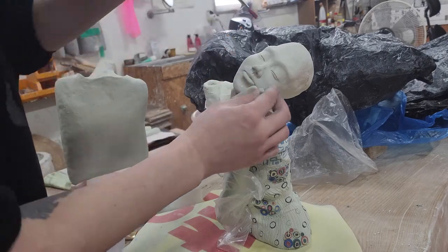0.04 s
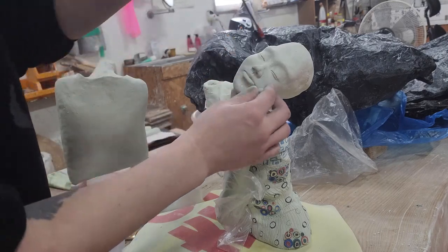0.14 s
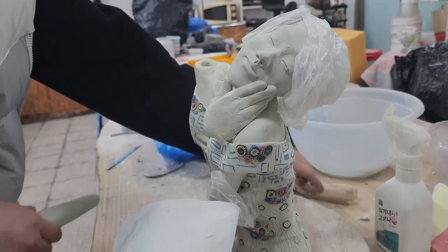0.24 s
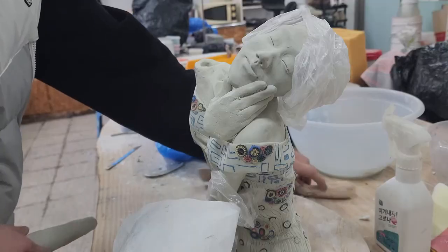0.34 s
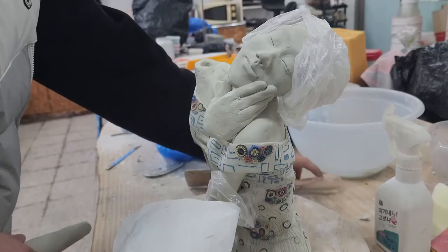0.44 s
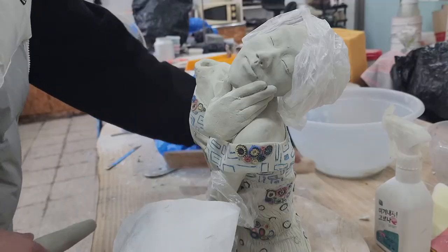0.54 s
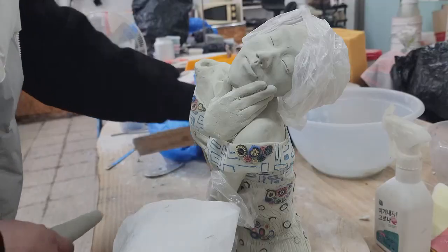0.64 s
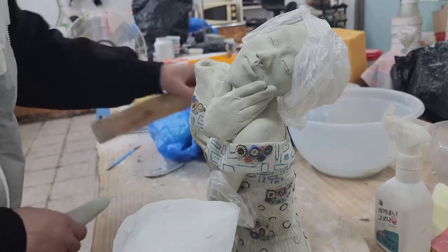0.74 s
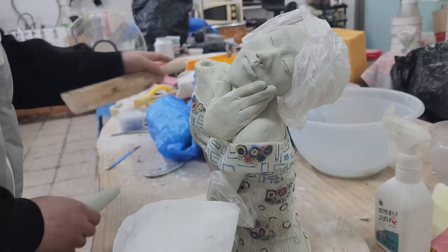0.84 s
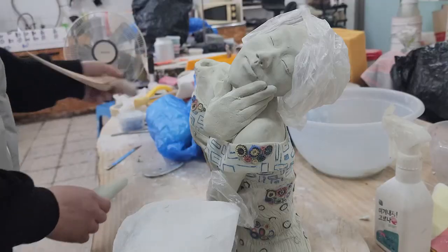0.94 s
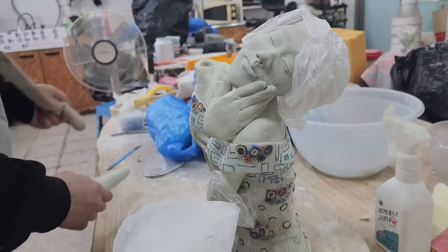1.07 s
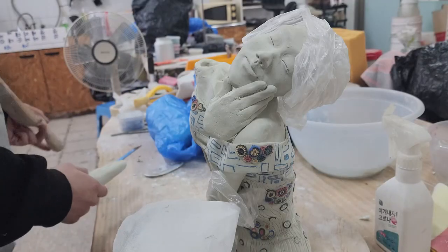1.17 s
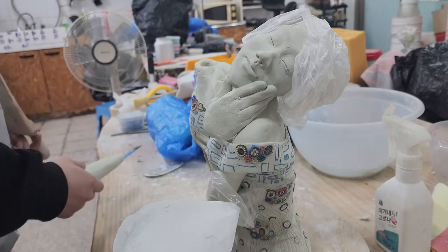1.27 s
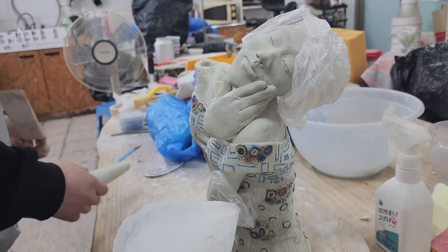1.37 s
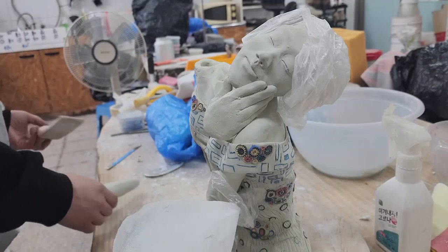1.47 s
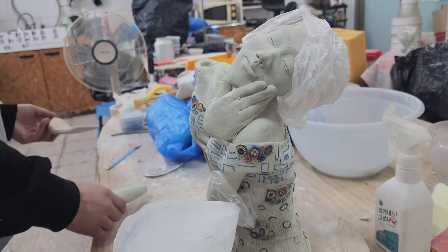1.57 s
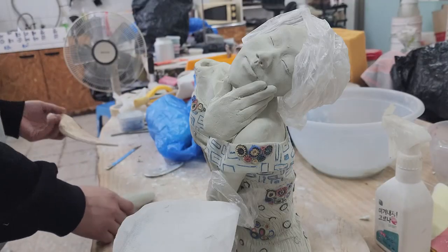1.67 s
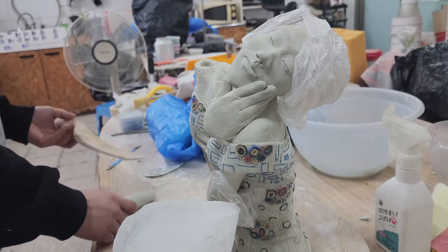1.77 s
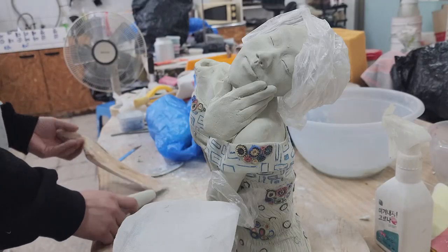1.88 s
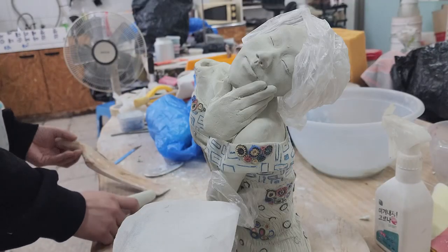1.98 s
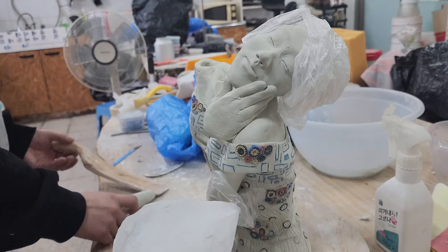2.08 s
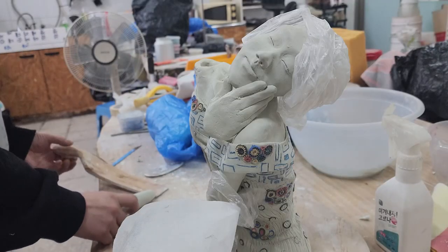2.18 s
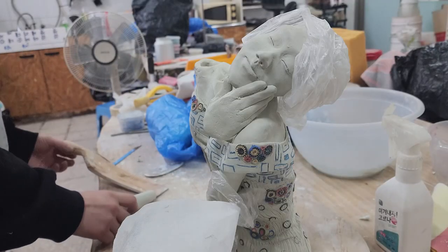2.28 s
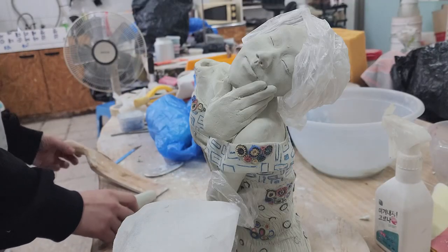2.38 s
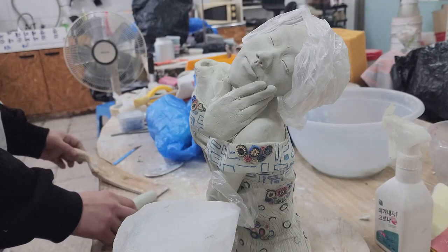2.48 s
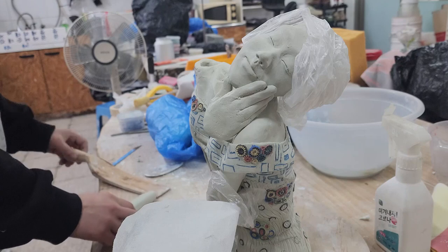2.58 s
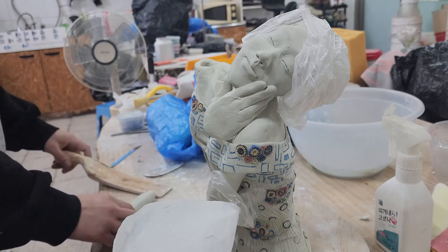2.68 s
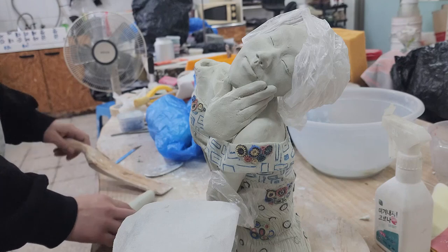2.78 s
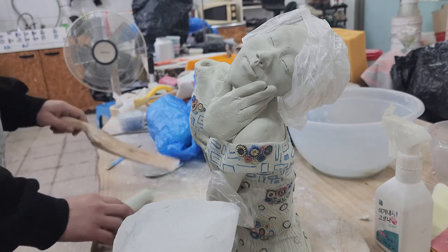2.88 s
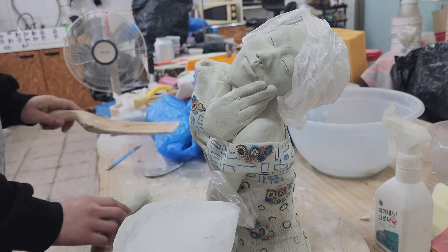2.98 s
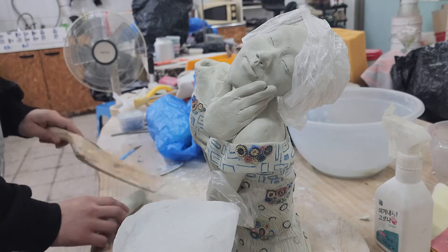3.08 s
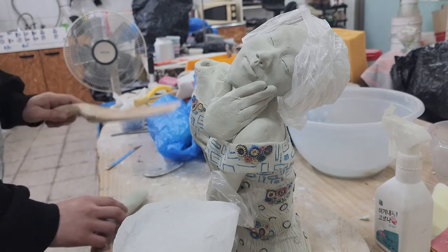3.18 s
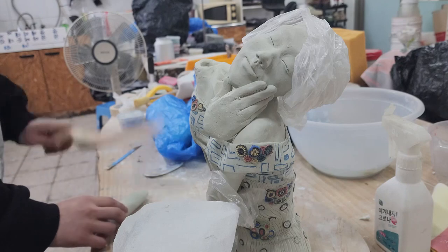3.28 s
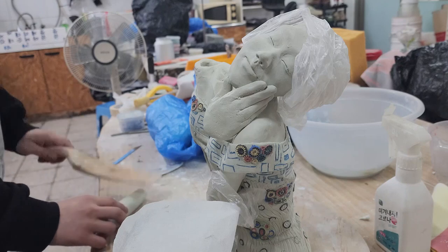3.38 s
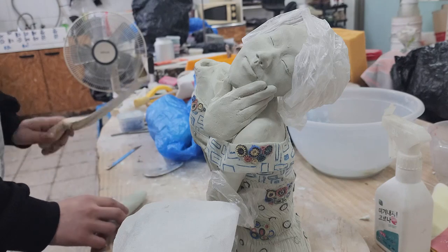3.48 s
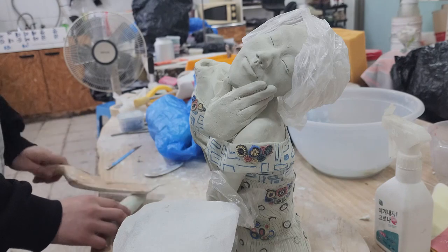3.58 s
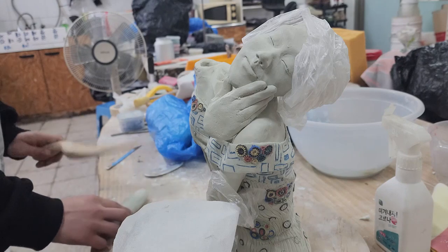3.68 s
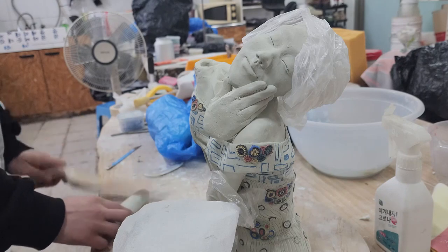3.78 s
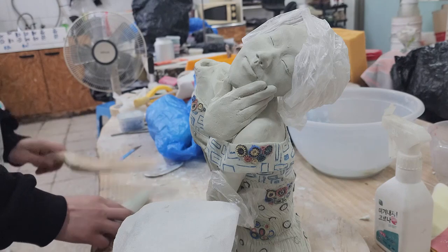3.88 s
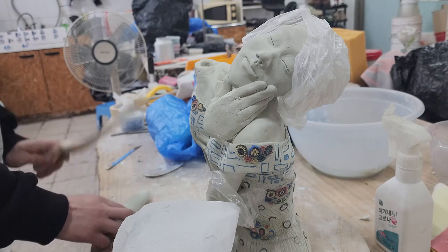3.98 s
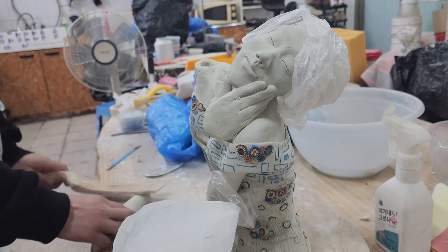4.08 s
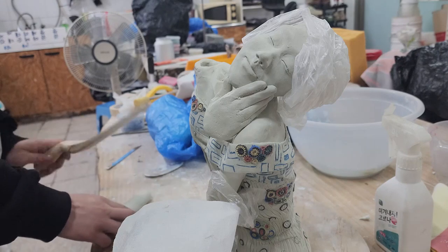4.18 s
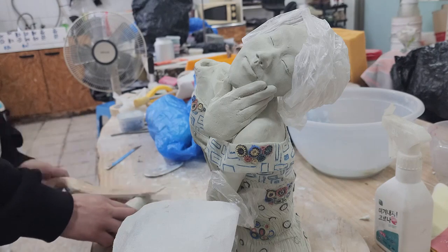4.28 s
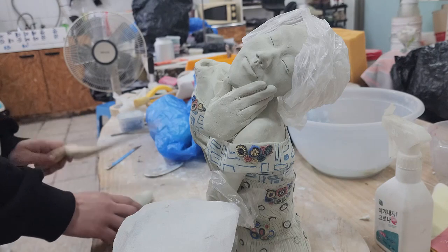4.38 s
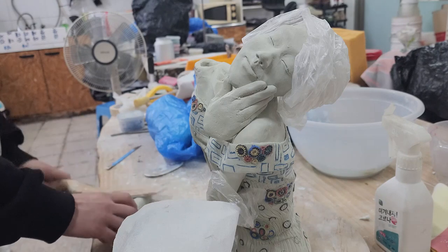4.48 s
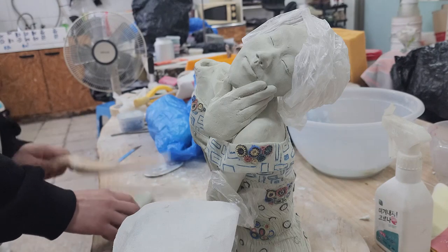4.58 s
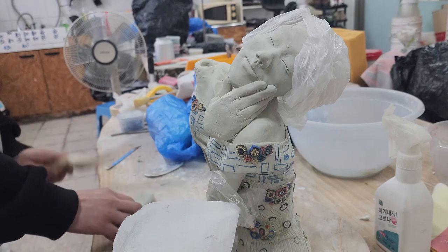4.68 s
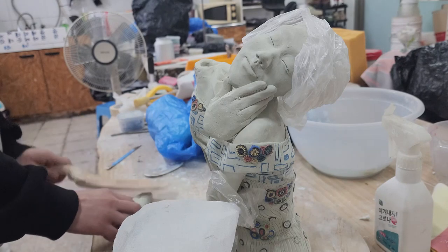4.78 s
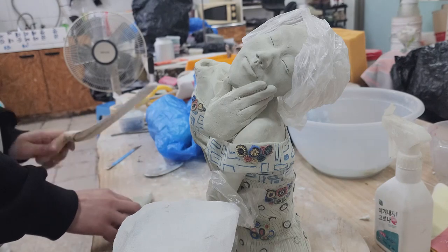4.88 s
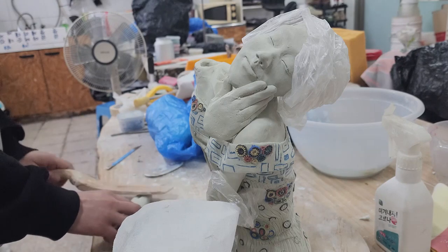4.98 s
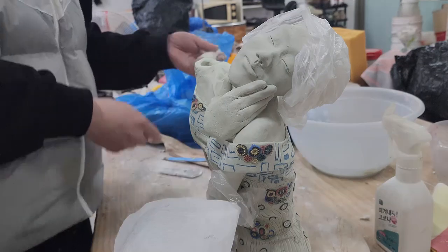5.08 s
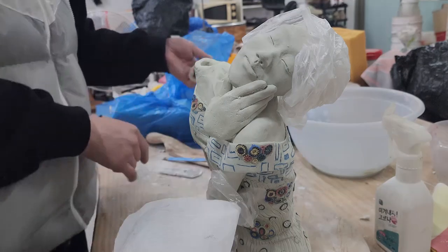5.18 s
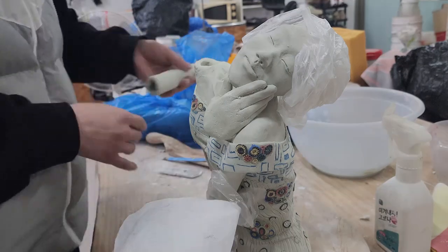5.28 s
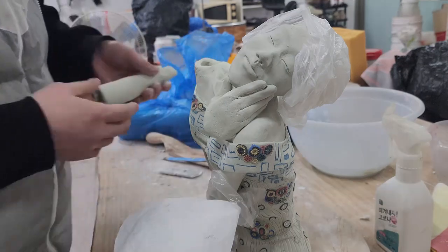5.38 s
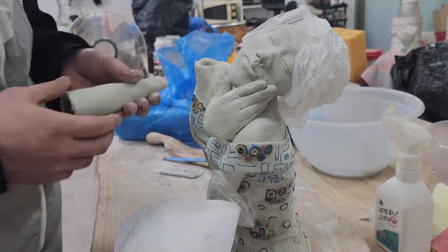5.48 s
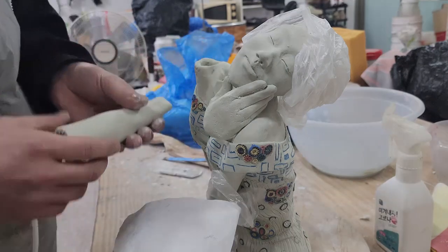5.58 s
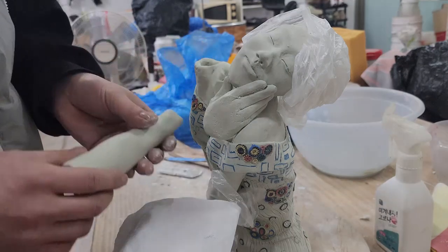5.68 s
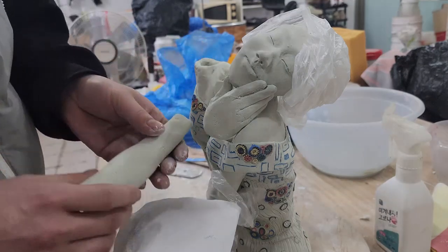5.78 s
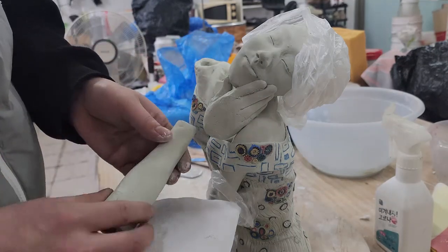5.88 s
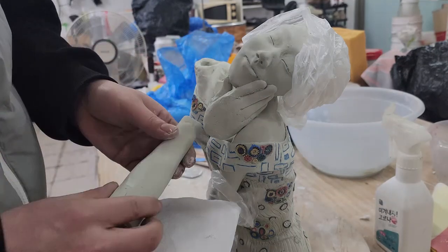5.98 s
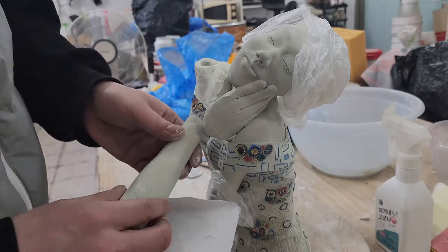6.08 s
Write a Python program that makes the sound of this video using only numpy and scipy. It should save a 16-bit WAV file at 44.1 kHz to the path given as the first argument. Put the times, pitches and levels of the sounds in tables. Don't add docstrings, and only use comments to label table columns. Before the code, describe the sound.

In a quiet studio with low rumble, a wooden paddle clatters lightly as it lifts from a bench and nylon sleeves rustle. After faint taps and creasing cloth, eight evenly spaced hollow, wet slaps land on soft clay, about four per second, with bench thump and short room echo. The last echo cuts off abruptly, leaving rustle and soft hiss. Close stereo camera microphone.

```python
import sys
import numpy as np
from scipy import signal
from scipy.fft import rfft, irfft, next_fast_len
from scipy.io import wavfile
from scipy.ndimage import uniform_filter1d

SR = 44100
rng = np.random.default_rng(int(sys.argv[2]) if len(sys.argv) > 2 else 0)


def wav_record(signal):
    frames = np.transpose(np.atleast_2d(signal))
    bounded = np.clip(frames, -1, 1)
    quanta = np.round(bounded * 32767).astype(np.int16)
    wavfile.write(sys.argv[1], SR, quanta)


def boost_factor(decibels):
    exponent = np.asarray(decibels, float) / 20
    return 10 ** exponent


N = 271028
SCENE_CHANGE_S = 5.0925


def unit(x):
    return x / np.sqrt(np.mean(x ** 2) + 1e-20)


def along(points, hz, column=1):
    p = np.transpose(points)
    return np.interp(np.log(hz + 1), np.log(p[0] + 1), p[column])


def curves(rows):
    s, *cols = np.transpose(rows)
    return [np.interp(np.arange(N) / SR, s, c) for c in cols]


def add(out, x, s):
    part = out[:, round(s * SR):][:, :x.shape[1]]
    part += x[:, :part.shape[1]]


# f/Hz, left-right likeness [0..1]
COHERENCE = [(40, 1), (300, 0.9), (1000, 0.17), (3000, 0.24), (10000, 0.21)]


def rush(spectrum, patchy_db):
    z = signal.stft(rng.standard_normal((2, N)), nperseg=512)[2]
    field = rng.standard_normal(z.shape[1:])
    for axis in (0, 1):
        field = uniform_filter1d(field, size=8, axis=axis)
    pair = signal.istft(z * boost_factor(patchy_db * unit(field)), nperseg=512)[1][:, :N]
    m = next_fast_len(N + 8192)
    hz = np.fft.rfftfreq(m, 1 / SR)
    turn = np.arccos(np.clip(along(COHERENCE, hz), 0, 1)) / 2
    shaped = rfft(pair, m) * boost_factor(along(spectrum, hz))
    mid, side = irfft(shaped * [np.cos(turn), np.sin(turn)], m)[:, :N]
    return unit(np.array([mid + side, mid - side]))


def ring(modes, t, rise_cycles, spread_db):
    hz, db, t60 = np.transpose(modes)[:, :, None]
    luck = rng.standard_normal((2, len(modes), 1))
    decay = boost_factor(db + spread_db * luck[0] - 60 * t / t60)
    waves = decay * np.sin(2 * np.pi * hz * (1 + 0.018 * luck[1]) * t)
    swell = 1 - np.exp(-(t * hz / rise_cycles) ** 2)
    return (waves * swell).sum(axis=0)


def click(spectrum, t, smear_s):
    m = 4096
    cep = irfft(np.log(boost_factor(along(spectrum, np.fft.rfftfreq(m, 1 / SR)))), m)
    cep[1:m // 2] *= 2
    cep[m // 2 + 1:] = 0
    pulse = irfft(np.exp(rfft(cep)), m)[:len(t)]
    pulse /= np.abs(pulse).max()
    contacts = 0.41 * boost_factor(-60 * t / smear_s) * rng.standard_normal(len(t))
    contacts[0] = 1
    return np.array([np.convolve(contacts, pulse[:512])[:len(t)], 1.84 * pulse])


# f/Hz, level/dB, t60/s, left-right likeness [0..1]
STUDIO = [(101, 5.5, 0.4, 0.93), (350, 6, 0.29, 0.77), (910, -12.5, 0.36, 0.33), (1300, -1, 0.27, 0.83),
          (2130, 3.5, 0.29, .3), (4730, 2, 0.34, 0.26), (9550, 3.5, 0.23, .3), (15000, 1.5, 0.25, 0.23)]
# delay t/s, level/dB
WALLS = [(.0085, -10.5), (.0135, -18), (.0185, -18.5), (.024, -28.5), (.03, -20)]


def in_studio(dry, pan_db, wet_db, spot=None):
    lead = 7
    same = 0.35
    field = rng.standard_normal((2, SR // 2))
    if spot is not None:
        field = np.sqrt(same) * spot + np.sqrt(1 - same) * field
    hz, t, z = signal.stft(field, SR, nperseg=256)
    turn = np.arccos(np.clip(along(STUDIO, hz, column=3), 0, 1))[:, None] / 2
    mid, side = np.cos(turn) * z[0], np.sin(turn) * z[1]
    z = np.array([mid + side, mid - side])
    decay_db = -60 * t / along(STUDIO, hz, column=2)[:, None]
    decay = boost_factor(decay_db) + boost_factor(-20.5 + 0.58 * decay_db)
    tail = signal.istft(z * boost_factor(along(STUDIO, hz))[:, None] * decay, SR, nperseg=256)[1]
    age = np.arange(tail.shape[1]) / SR
    tail *= boost_factor(wet_db - 30) * np.clip((age - 0.003) / 0.0024, 0, 1)
    tail *= np.clip((age[-1] - age) / 0.1, 0, 1)
    for delay, db in WALLS:
        arrival = round(delay * SR) + rng.integers(0, 8, 2)
        tail[[0, 1], arrival] += boost_factor(db + wet_db) * rng.choice([-1, 1])
    heard = signal.fftconvolve(dry[1:], tail, axes=1)
    heard[0, :dry.shape[1]] += dry[0]
    heard[1, lead:lead + dry.shape[1]] += dry[0]
    return heard * boost_factor([[pan_db / 2], [-pan_db / 2]])


# f/Hz, level/dB per Hz
RUMBLE = [(12, -36.5), (20, -7), (43, 3), (59, -7.5), (81, -2.5), (102, -13), (130, -6.5), (170, -38),
          (290, -120)]
# f/Hz, level/dB per Hz
TONE = [(65, -34.5), (110, 1.5), (256, -7), (435, -14.5), (1280, -18.5), (3160, -25.5), (3420, -32.5),
        (3690, -29.5), (5470, -33.5), (6040, -42.5), (7640, -32.5), (12000, -48.5), (15600, -65),
        (22000, -120)]
# t/s, tone level/dB
STIR = [
    (0, -2.5),
    (.26, -1),
    (.46, 3.5),
    (1.6, 3),
    (2.1, 2),
    (3.4, 0.5),
    (4.1, 8),
    (5.05, 7),
    (5.6, 2.5),
    (6.15, 0),
]
# from t/s, rumble level/dB
SHOTS = [
    (0, -1.5),
    (.27, -0.5),
    (5.0925, 1.5),
]


def studio_air():
    rumble_db, tone_db, shake_db = -54, -60, -45.5
    shake_rise_s, shake_fall_s = 0.08, 0.12
    stir_db, = curves(STIR)
    t = np.arange(N) / SR
    since, shot_db = np.transpose(SHOTS)
    shot_db = shot_db[np.searchsorted(since[1:], t)]
    age = np.clip(t - np.array(BLOWS)[:, :1], 0, None)
    shake = (1 - np.exp(-(age / shake_rise_s) ** 2)) * np.exp(-age / shake_fall_s)
    shake = shake.sum(axis=0) * (t < SCENE_CHANGE_S)
    rumble = boost_factor(rumble_db + shot_db) + boost_factor(shake_db) * shake
    tone = boost_factor(tone_db + stir_db)
    return rumble * rush(RUMBLE, patchy_db=-2.34) + tone * rush(TONE, patchy_db=-2.87)


# f/Hz, level/dB per Hz
RUSTLE = [(900, 2), (2000, -6), (4500, -7.5), (7500, -8), (9500, -17.5), (12000, -38.5)]
# f/Hz, level/dB per Hz
FIZZ = [(6500, -33), (9000, 3), (12000, 0.5), (15500, 5.5), (17000, -40)]
# start t/s, length t/s, rustle level/dB, fizz over rustle level/dB
SWIPES = [(.24, 0.011, -75, -35), (.275, 0.1, -60, -9.5), (.4, 0.23, -65.5, -7.5), (.68, 0.13, -70, -9),
          (.8, .06, -63.5, -12), (.86, 0.23, -63, -15), (1.09, 0.085, -58.5, -6.5),
          (1.19, 0.11, -62.5, -10), (1.335, 0.037, -59.5, -5), (1.39, 0.28, -62.5, -8.5),
          (1.845, 0.036, -64, -4), (2.03, 0.13, -61.5, -8), (2.28, 0.15, -67.5, -14),
          (2.59, 0.028, -60.5, -14), (2.67, 0.041, -67.5, -8), (2.86, 0.042, -66, -16),
          (2.93, .14, -72.5, -8), (3.16, 0.035, -74, -8), (3.25, 0.045, -70, -29), (3.3, 0.12, -70.5, -5),
          (5.09, 0.1, -60, -14), (5.282, 0.026, -55.5, -16), (5.33, 0.3, -62, -15), (5.44, .2, -55, -12.5),
          (5.62, 0.24, -52, -12.5), (5.9, 0.062, -68, -12), (6.07, 0.13, -65, -15)]


def sleeves():
    rise_share, settle_t60_s = 0.2, 0.45
    s, length, db, fizz_db = np.transpose(SWIPES)[:, :, None]
    t = np.arange(0, N + 64, 64) / SR
    rise = np.clip((t - s) / (rise_share * length), 0, 1) ** 2
    speed = rise * boost_factor(db - 60 * np.clip(t - s - length, 0, None) / settle_t60_s)
    rustle = np.linalg.norm(speed, axis=0)
    fizz = np.linalg.norm(speed * boost_factor(fizz_db), axis=0)
    rustle, fizz = curves(np.transpose([t, rustle, fizz]))
    return rustle * rush(RUSTLE, patchy_db=1.6) + fizz * rush(FIZZ, patchy_db=3.5)


# t/s, level/dB, f/Hz, length t/s
CREASES = [(1.352, -56.5, 3550, 0.073), (1.451, -60.5, 4270, 0.028), (1.48, -73, 2920, 0.035),
           (2.557, -59, 3340, 0.088), (2.616, -59.5, 3440, .06), (2.662, -67, 4380, 0.059),
           (2.889, -57.5, 5200, 0.04), (2.893, -58, 7100, 0.031), (2.902, -62, 3400, 0.055),
           (3.17, -66, 6550, .03), (3.265, -63, 6170, 0.019), (3.323, -66.5, 8000, 0.036)]


def creases():
    out, t = np.zeros((2, N)), np.arange(SR // 5) / SR
    for s, db, hz, length in CREASES:
        band = signal.butter(1, [hz * 0.96, hz * 1.06], "bandpass", fs=SR, output="sos")
        noise = unit(signal.sosfilt(band, rng.standard_normal((2, len(t)))))
        envelope = (1 - np.exp(-t / 0.0025)) * np.exp(-(t / length) ** 2)
        add(out, boost_factor(db) * noise * envelope, s)
    return out


# t/s, knock level/dB, knock f/Hz, click level/dB, bright level/dB
TAPS = [
    (.36, -43, 464, -41.5, -66),
    (0.492, -30.5, 358, -27, -27),
    (2.0039, -47, 456, -20.5, -53),
    (2.6018, -46.5, 445, -41, -63),
]
# t/s, knock level/dB, knock f/Hz, bright level/dB, bright f/Hz
BUMPS = [(.367, -33, 444, -40, 970), (.387, -36, 463, -33, 1300), (0.3944, -26.5, 434, -57, 900),
         (0.4096, -35, 404, -27.5, 950), (.4135, -40, 330, -33.5, 1300), (.423, -40.5, 335, -53, 900),
         (0.435, -41, 348, -58, 990), (0.462, -47, 338, -58, 900), (0.5778, -33, 767, -34, 1500),
         (0.596, -50, 337, -60, 900), (2.5557, -43, 440, -37, 1490), (2.482, -62, 350, -49, 2940),
         (5.286, -43, 202, -46, 2000), (5.354, -54.5, 700, -43, 1500), (5.722, -46.5, 301, -70, 910)]
# f/Hz, level/dB per Hz
CLACK = [(200, -9), (600, -3), (1500, -8.5), (2800, 4), (4300, 0.5), (6000, -7.5), (9000, -8), (15000, -32),
         (17000, -46)]
# f/Hz, level/dB, t60/s
WOOD = [(1350, -13, .02), (1720, -12, .02), (2700, -2, .024), (3394, -2, .022), (3800, -5, .018),
        (4290, -1, .024), (4800, -4, .018), (5300, -4, .022)]


def taps():
    soft_click_db, hard_bright = -17, 5.23
    out, t = np.zeros((2, N)), np.arange(SR // 12) / SR
    soft = [(*row, row[3] + soft_click_db) for row in BUMPS]
    hard = [(s, db, hz, bright_db, hard_bright * hz, click_db)
            for s, db, hz, click_db, bright_db in TAPS]
    for s, low_db, low_hz, high_db, high_hz, click_db in hard + soft:
        modes = [(low_hz, low_db + 7, 0.035), (high_hz, high_db, 0.016)]
        knock = ring(modes, t, rise_cycles=0.45, spread_db=1)
        free = boost_factor(click_db - 10) * ring(WOOD, t, rise_cycles=0.2, spread_db=2)
        clack = boost_factor(click_db + 3.5) * click(CLACK, t, smear_s=0.0083)
        add(out, in_studio(knock + free + clack, pan_db=-0.5, wet_db=-3.5), s)
    return out


# t/s, peak level/dB, paddle f/Hz, overtone level/dB, slap level/dB
BLOWS = [
    (3.4207, -11, 852, -12, -15),
    (3.6719, -6, 808, -14, -16.5),
    (3.898, -7, 820, -15, -12.5),
    (4.1339, -4, 801, -16.5, -18.5),
    (4.363, -4.5, 825, -11.5, -15.5),
    (4.586, -3, 863, -8, -15.5),
    (4.8155, -10, 794, -13.5, -14),
    (5.07, -11, 860, -3, -18),
]
# f/Hz, level/dB, t60/s
OVERTONES = [(1500, -1.5, 0.024), (2004, -1, .012), (2100, 0.5, 0.015), (2450, 0, .009), (3110, -1, 0.0068)]
# f/Hz, level/dB per Hz
SLAP = [(60, -27), (300, 1), (700, -2), (2500, 4), (4500, -6), (9000, -13), (15500, -25), (17000, -51.5)]
# f/Hz, level/dB, t60/s
BENCH = [(36.57, -10.5, 0.68), (64.1, -9.5, 0.25), (88, -8, .25), (123.3, -3.5, 0.27), (157, -0.5, 0.27),
         (192.1, -2, .16), (254.6, -10, 0.077), (319.7, -1, 0.18), (340.9, 2, 0.13), (368.5, -3, 0.19)]


def paddle():
    slap_tilt = 0.56
    bench_db, bench_grows = -23, 0.28
    edge_on_db = -1.5
    out, t = np.zeros((2, N)), np.arange(SR // 20) / SR
    long, spot = np.arange(SR) / SR, rng.standard_normal((2, SR // 2))
    for s, db, hz, over_db, slap_db in BLOWS:
        note = np.sin(2 * np.pi * hz * t)
        note *= (1 - np.exp(-(t / 0.00078) ** 2)) * np.exp(-(t / 0.0051) ** 2)
        tilt = slap_tilt * (slap_db - over_db + 3)
        modes = [(f, g + tilt * np.log2(f / 2000), t60) for f, g, t60 in OVERTONES]
        over = boost_factor(over_db + 1.0) * ring(modes, t, rise_cycles=0.82, spread_db=2.0)
        slap = boost_factor(slap_db + 13.5) * click(SLAP, t, smear_s=0.0073)
        blow = boost_factor(db + 1.5) * (note + over * boost_factor([[edge_on_db], [0]]) + slap)
        add(out, in_studio(blow, pan_db=-1.5, wet_db=-4.0, spot=spot), s)
        bench = boost_factor(bench_db + bench_grows * db) * ring(BENCH, long, rise_cycles=1.87, spread_db=2.0)
        add(out, bench * boost_factor([[-1.3], [1.3]]), s + 0.0011)
    return out * np.clip((SCENE_CHANGE_S - np.arange(N) / SR) / 0.00084, 0, 1)


def scene():
    background = studio_air() + sleeves() + creases()
    return background * boost_factor([[-1.2], [1.2]]) + taps() + paddle()


def top_cut(x):
    return signal.sosfilt(signal.butter(12, 16810, fs=SR, output="sos"), x)


def record(dry):
    mix = np.clip(dry, -1, 1)
    return top_cut(mix)


dry = scene()
out = record(dry)
wav_record(out)
```